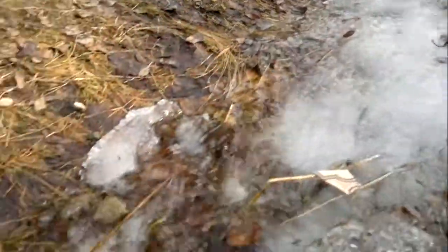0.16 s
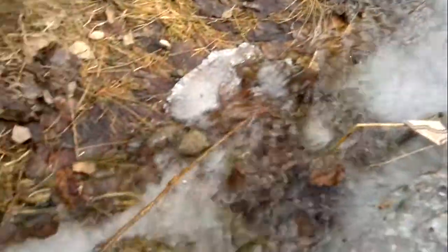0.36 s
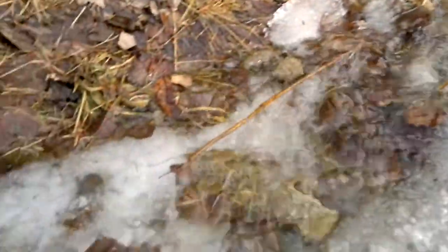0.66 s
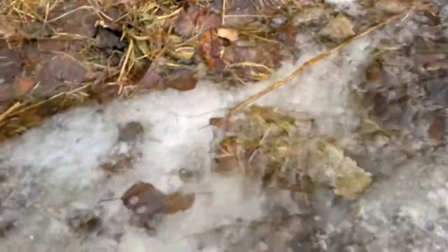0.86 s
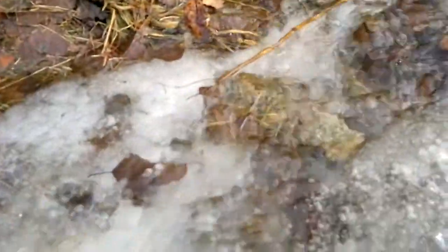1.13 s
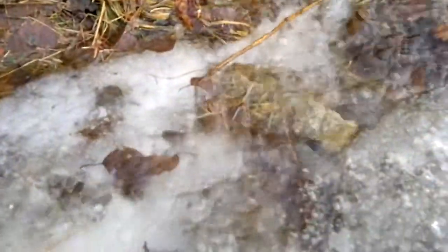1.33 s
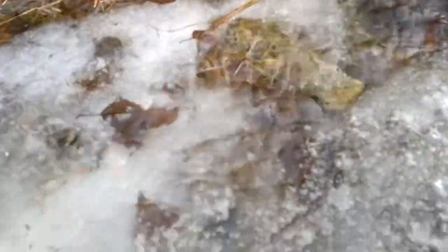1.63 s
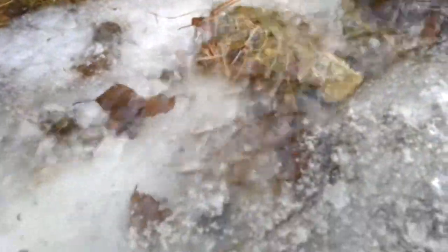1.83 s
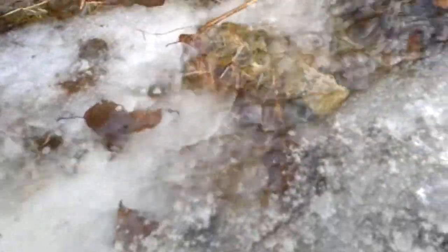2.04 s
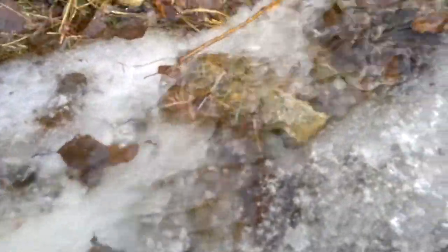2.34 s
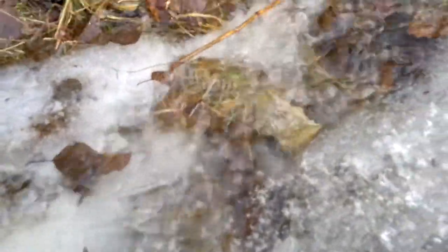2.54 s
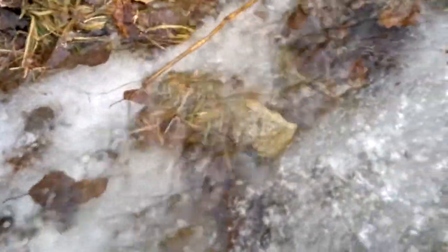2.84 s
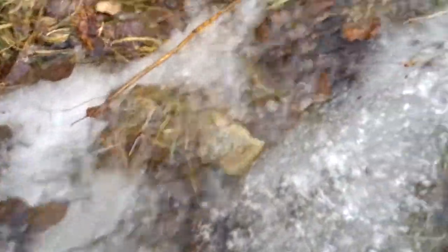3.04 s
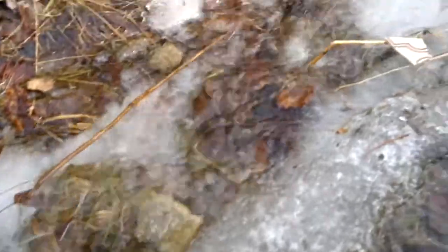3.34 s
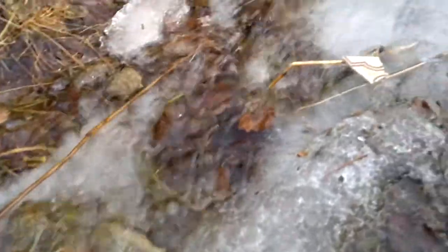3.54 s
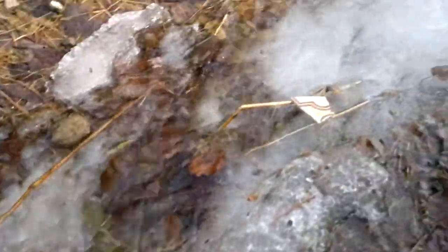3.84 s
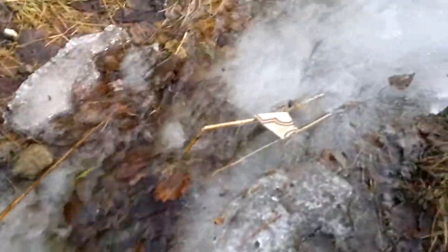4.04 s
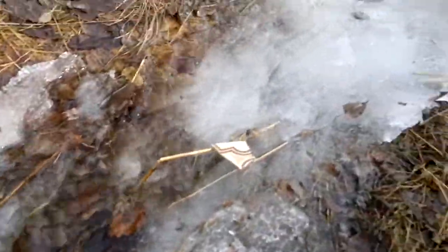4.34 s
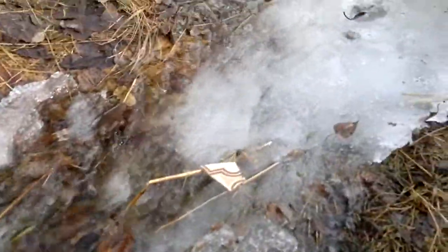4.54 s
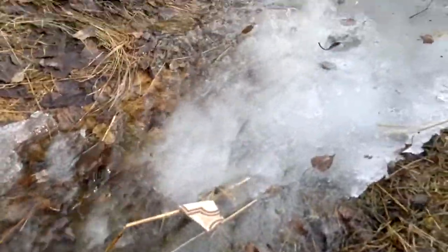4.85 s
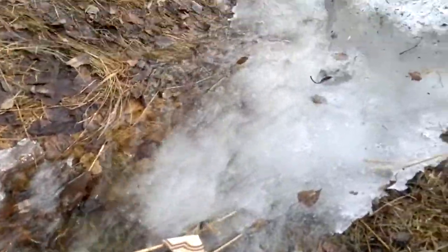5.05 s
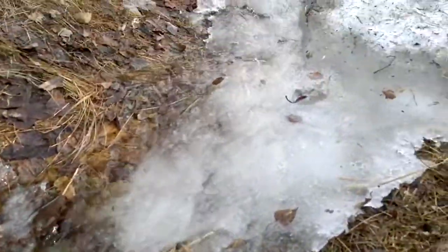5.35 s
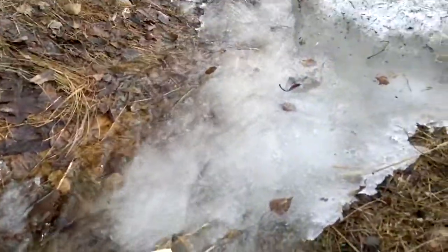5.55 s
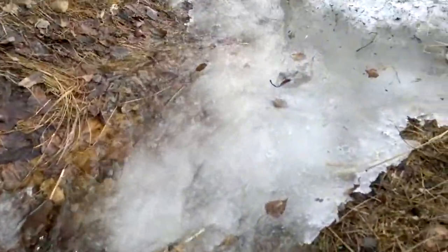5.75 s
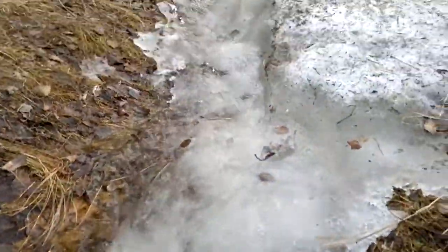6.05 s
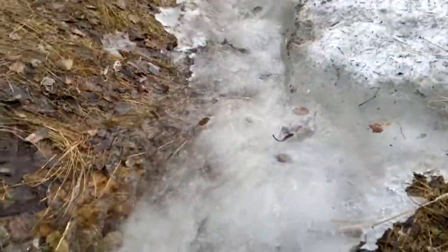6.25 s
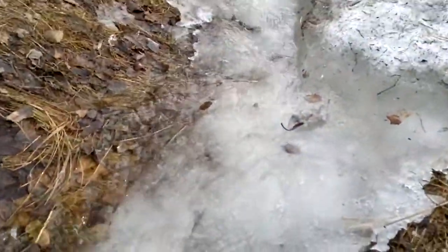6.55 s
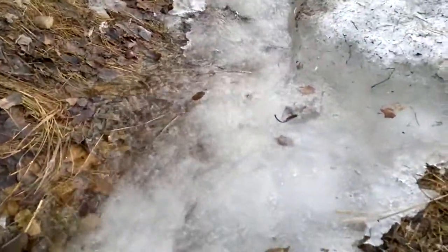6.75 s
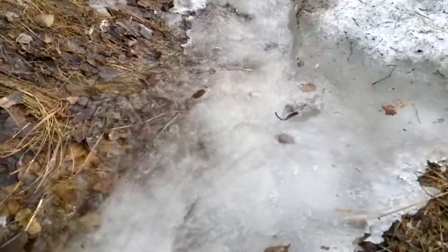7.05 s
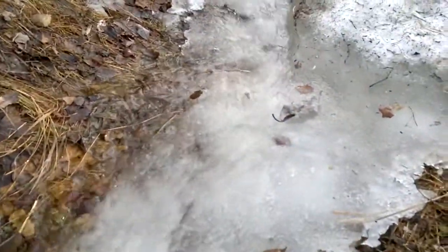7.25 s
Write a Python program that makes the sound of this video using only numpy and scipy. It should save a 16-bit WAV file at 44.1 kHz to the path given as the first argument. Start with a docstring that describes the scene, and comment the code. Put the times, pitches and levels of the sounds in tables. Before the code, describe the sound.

A small meltwater stream runs throughout, close and outdoors with no echo: a soft, rounded low-mid burbling rush, lighter splashing towards the right, and a very faint fizz. Nearer, mostly left, tiny bubbles tick and gurgle, and single clear plinks ring at 0.1 to 0.3 s, 0.8 s, 2.7 s, 5.2 s and in a quick run near 5.9 s. Wind buffets the microphone from 0.5 s, with light thumps and pops until 0.9 s, then a calmer gap. Heavy booming thumps with snapping pops hit at 1.9 and 2.2 s, with another very strong one at 2.8 s. Water is more exposed from 3 to 4 s, before a hard thump at 4.2 s, rumble around 4.5 s and left-leaning hits at 5 and 5.3 s. Smaller pops come at 5.9 and 6.3 s, a sharp bright snap at 6.5 s, then low breeze rumble swells to the end at about 7.3 s.

```python
"""A small meltwater stream rushes over ice and dead leaves throughout: shaped noise plus swarms of ringing bubbles.
Close by, mostly on the left, tiny bubbles tick and gurgle, and single plinks ring from the first moments on.
From half a second in, wind thumps and pops on two microphone ports: noise swells and pressure spikes.
Strong hits cluster around 2 s and 2.8 s, come back at 4.2 s and 5 s, and a sharp snap lands near 6.5 s.
The breeze is strongest at the very end; a limiter ducks whatever exceeds its ceiling."""
import sys
import numpy as np
from scipy import signal
from scipy.fft import rfft, irfft, next_fast_len
from scipy.io import wavfile
from scipy.ndimage import uniform_filter1d, minimum_filter1d, map_coordinates

SR = 44100
rng = np.random.default_rng(int(sys.argv[2]) if len(sys.argv) > 2 else 0)


def transcribe(signal):
    """Save signal, clipped to [-1, 1], as a 16-bit WAV file at the path in sys.argv[1]."""
    frames = np.atleast_2d(signal).T
    limited = np.clip(frames, -1, 1)
    pcm = np.round(limited * 32767).astype(np.int16)
    wavfile.write(sys.argv[1], SR, pcm)


N = 325899
T = np.arange(N) / SR  # time of each sample [s]
TOP_HZ = 15700  # band limit of the whole mix


def amp(db):
    """Decibels to gain."""
    return 10 ** (np.asarray(db) / 20)


def unit(x):
    """Scaled to rms 1."""
    return x / np.sqrt(np.mean(x ** 2) + 1e-20)


def curves(rows):
    """One automation curve, a value per sample, for each column after the time."""
    s, *cols = np.transpose(rows)
    return [np.interp(T, s, c) for c in cols]


def wobble(rate):
    """A random curve, smooth between its knots, rate knots a second."""
    knots = rng.standard_normal(int(N * rate / SR) + 4)
    return map_coordinates(knots, [T * rate], mode="nearest")


def sides(pan_db):
    """Left and right gains whose mean is 1; positive pan leans left."""
    left = amp(np.atleast_1d(pan_db))
    return 2 * np.array([left, np.ones_like(left)]) / (1 + left)


def colour(x, points):
    """EQ: x through a response drawn through (frequency [Hz], level [dB]) points."""
    n = x.shape[-1]
    size = next_fast_len(n + 4096)  # padding against wrap-around
    hz, db = np.transpose(points)
    log_hz = np.log(np.fft.rfftfreq(size, 1 / SR) + 1)
    gain = amp(np.interp(log_hz, np.log(hz), db))
    return irfft(rfft(x, size) * gain, size)[..., :n]


def pair(alike, size=N):
    """Stereo white noise; alike is the correlation of its two sides."""
    mid, side = rng.standard_normal((2, size))
    turn = np.arccos(np.clip(alike, -1, 1)) / 2
    return np.cos(turn) * mid + np.sin(turn) * np.array([side, -side])


def patchy(x, depth_db):
    """Patches of random gain across time and pitch, shared by both sides."""
    z = signal.stft(x, nperseg=512)[2]
    field = rng.standard_normal(z.shape[1:])
    field = uniform_filter1d(field, size=4, axis=0)  # across pitch
    field = uniform_filter1d(field, size=9, axis=1)  # across time
    return signal.istft(z * amp(depth_db * unit(field)), nperseg=512)[1][:, :N]


def add(track, s, sound):
    """Mix a stereo sound in from time s."""
    start = max(round(s * SR), 0)
    part = track[:, start:start + sound.shape[1]]
    part += sound[:, :part.shape[1]]


def bubbles(s, size, hz, cycles, pan_db, rise):
    """Each bubble rings for a few cycles and climbs in pitch as it nears the surface."""
    step = np.arange(640)  # samples that each ring is given
    turns = hz[:, None] * step / SR
    age = turns / cycles[:, None]
    swell = np.exp(-age) * (1 - np.exp(-turns))  # soft onset, then decay
    tone = np.sin(2 * np.pi * turns * (1 + rise * np.minimum(age, 10) / 2))
    ring = size[:, None] * swell * tone
    where = ((s * SR).astype(int)[:, None] + step).ravel()
    return np.array([np.bincount(where, (ring * g[:, None]).ravel(), N)[:N] for g in sides(pan_db)])


def swarm(count, hz, octaves, cycles, scatter_db, pan_db):
    """Bubbles of random size at random times, many small and few large, rms 1."""
    when, strength = rng.random((count, 2)).T
    pitch, life, place = rng.standard_normal((count, 3)).T
    size = amp(-scatter_db * np.log(strength + .03))  # the offset caps the largest
    pitches = np.minimum(hz * 2 ** (octaves * pitch), TOP_HZ)
    lives = cycles * np.exp(life / 3)
    return unit(bubbles(when * N / SR, size, pitches, lives, pan_db + 3 * place, rise=0.051))


# the water's loudness before trims: (time [s], rush [dB], splash [dB], fizz [dB])
WATER_FLOW = [(0.0, -49.5, -66, -77), (0.3, -46, -58.5, -77.0), (0.62, -46, -64.5, -75),
              (0.87, -44, -62, -77), (1.45, -47, -66.5, -77.5), (2.02, -45, -64, -77.5),
              (2.35, -42.0, -58.5, -76.5), (2.75, -45.5, -57.5, -74.5), (2.86, -51.5, -62.5, -81),
              (3.35, -50, -62.5, -77.5), (3.58, -47, -59, -77), (4.18, -49.5, -63, -76.5),
              (4.5, -53.5, -67.5, -79.5), (5.1, -46, -61, -75), (5.45, -49.5, -61, -78),
              (6.08, -45.5, -56.5, -71.5), (6.65, -47.5, -63.5, -76.0), (7.3, -51.5, -63, -74.5)]
# tone of the water's three noise layers: (frequency [Hz], relative level [dB])
RUSH_TONE = [(40, -7), (120, -1), (250, 2), (370, 0), (480, -1.5), (620, -1), (800, -4.5), (1000, -7.5),
             (1250, -14.5), (1600, -20), (2200, -49), (3000, -63), (5000, -78)]
SPLASH_TONE = [(600, -28.5), (1200, -1.5), (1600, -2), (2000, 1.5), (2350, -7), (2650, -14), (3000, -27),
               (4000, -31.5), (8000, -59)]
FIZZ_TONE = [(1000, -14.5), (2800, 0.5), (4000, 2.5), (6000, -2.5), (10000, -3), (12500, -8),
             (15500, -19.5)]


def stream():
    """The burbling rush of the whole channel, the brighter splashing of its rapids and a faint fizz."""
    rush_db, splash_db, fizz_db = curves(WATER_FLOW)
    rush = unit(colour(patchy(pair(alike=0.94), depth_db=2.0), RUSH_TONE)) * sides(0.86)
    burble = swarm(count=2000, hz=645.7, octaves=0.454, cycles=2.44, scatter_db=1.5, pan_db=2.5)
    splash = unit(colour(patchy(pair(alike=-0.23), depth_db=2.5), SPLASH_TONE)) * sides(-11)
    fizz = unit(colour(pair(alike=0.03), FIZZ_TONE)) * sides(1.6)
    body = (rush + amp(-8) * burble) * amp(rush_db + 2.5 + 1.57 * wobble(8.1))
    splashing = splash * amp(splash_db + 2.5 + 1.5 * wobble(6))
    return body + splashing + fizz * amp(fizz_db + 0.86)


GURGLE_DB, TICK_DB, TINKLE_DB = -7.5, -1.5, 0  # gurgles re the splash; ticks and tinkle re the fizz
CLUSTER_HZ, CLUSTER_DB = 13, 4.5  # level swings of the bubbles: knots a second, greatest depth
SPURT_S = 0.026  # standard deviation of a spurt's bell curve
# spurts, brief changes in bubble level before each layer's share: (time [s], boost [dB])
BUBBLE_SPURTS = [(.24, 5), (.83, 6.5), (1.72, 7.5), (2.53, 2), (2.66, 3.5), (2.75, 3), (3.55, 1),
                 (5.87, 4.5), (6.6, -1), (6.97, 7.5)]
# tone of the bursting bubbles: (frequency [Hz], relative level [dB])
TICK_TONE = [(2000, -8), (3300, -8.5), (4500, -3.5), (6000, -4.5), (8000, 1), (10300, -0.5), (12500, -5.5),
             (15500, -14.5)]


def riffle():
    """Water folds over ice close by: gurgles follow the splashing, tiny bursting bubbles follow the fizz."""
    _, splash_db, fizz_db = curves(WATER_FLOW)
    spurt_db = sum(db * np.exp(-((T - s) / SPURT_S) ** 2 / 2) for s, db in BUBBLE_SPURTS)
    cluster_db = CLUSTER_DB * np.tanh(wobble(CLUSTER_HZ)) + spurt_db
    gurgle = swarm(count=2000, hz=1950, octaves=.22, cycles=6, scatter_db=5, pan_db=13)
    bursts = swarm(count=2400, hz=7800, octaves=.5, cycles=1.6, scatter_db=7, pan_db=19)
    tinkle = swarm(count=2000, hz=4300, octaves=.42, cycles=6, scatter_db=5.5, pan_db=16)
    ticks = unit(colour(bursts, TICK_TONE))
    spray = amp(TICK_DB) * ticks + amp(TINKLE_DB) * tinkle
    gurgling = gurgle * amp(splash_db + GURGLE_DB + 0.77 * cluster_db)
    return gurgling + spray * amp(fizz_db + cluster_db)


PLINK_PAN_DB, PLINK_CYCLES = 18.5, 7.3  # lean to the left; cycles in which a ring decays to 1/e
# single bubbles that ring out clearly: (time [s], level before a common lift [dB], starting pitch [Hz])
CLEAR_PLINKS = [(.075, -51, 3280), (.225, -48, 2030), (.239, -57, 4760), (0.333, -39, 1940),
                (.623, -53.5, 2740), (.636, -54, 8000), (.83, -42.5, 1970), (1.27, -48.5, 1940),
                (1.31, -51, 13300), (2.477, -50, 1960), (2.708, -44.5, 2160), (2.771, -48, 4380),
                (3.334, -57, 2920), (3.958, -46.5, 2160), (4.359, -51.5, 5670), (5.158, -44, 4050),
                (5.841, -52, 4220), (5.861, -52, 5160), (5.877, -49, 4300), (5.894, -47, 3520),
                (6.201, -49, 4350), (6.506, -58, 4560), (6.618, -55, 6550), (7.132, -54.5, 3720)]


def plinks():
    """Single bubbles ring out above the rest, each a decaying sine."""
    s, db, hz = np.transpose(CLEAR_PLINKS)
    each = np.ones(len(s))
    return bubbles(s, amp(db + 4), hz, PLINK_CYCLES * each, PLINK_PAN_DB * each, rise=0.016)


GUST_RISE, GUST_FALL = 0.93, 0.88  # factors on a gust's spread: it swells a little slower than it fades
# eddies that hit the ports:
# (time [s], thump level [dB], spread before rise and fall factors [s], left-right [dB], hiss level [dB])
EDDY_HITS = [(.533, -35, 0.021, 15, -61.5), (.776, -26.5, 0.01, 6, -53.5), (0.915, -25, 0.0046, 29, -67),
             (1.627, -29, .03, 12, -66), (1.715, -31, 0.032, 6, -68), (1.819, -19.5, 0.015, 6.5, -70),
             (1.887, -7, 0.011, 0, -51), (2.162, -7.5, 0.02, 8.5, -51), (2.203, -11.5, 0.0085, 4, -65.5),
             (2.424, -24, 0.013, 11.5, -51.5), (2.531, -16.5, 0.007, 8, -53),
             (2.561, -17.5, 0.0088, -2.5, -63), (2.651, -39, .012, -3, -55), (2.805, -6.5, 0.012, 0.5, -53),
             (2.944, -29.5, 0.0094, -3, -67.5), (3.262, -31.5, 0.032, 10, -86),
             (3.549, -29, 0.012, 4, -54.5), (3.692, -27, 0.023, 8, -76), (4.249, -8.5, 0.015, 3.5, -60),
             (4.544, -17.5, 0.026, 6, -70), (4.629, -20, 0.019, 7.5, -79), (5.013, -11, 0.0069, 28, -67.5),
             (5.048, -30, 0.022, 18, -66), (5.249, -26, .0086, 10, -60), (5.315, -27, 0.015, 23, -66),
             (5.929, -36.5, 0.033, -5, -55), (6.098, -28.5, 0.025, -2, -58.5),
             (6.281, -28.5, 0.014, 1, -62), (7.042, -23.5, 0.015, -12, -77)]
# tone of a gust's two layers: (frequency [Hz], relative level [dB])
THUMP_TONE = [(10, -28.5), (28, -3.5), (48, 0), (70, -6), (120, -14.5), (180, -21), (330, -35), (700, -40),
              (1400, -68.5), (4000, -104)]
HISS_TONE = [(100, -10.5), (400, -3.5), (800, -6), (1400, 8.5), (2500, 5), (3500, -8.5), (5500, -16.5),
             (9000, -37), (15000, -42)]


def gusts():
    """Each eddy that hits the ports makes a thump and a short hiss, two noises under one swell."""
    out = np.zeros((2, N))
    size = SR // 5
    t = (np.arange(size) - size / 2) / SR
    for s, db, spread, pan_db, hiss_db in EDDY_HITS:
        spreads = spread * np.where(t < 0, GUST_RISE, GUST_FALL)
        swell = np.exp(-(t / spreads) ** 2 / 2)
        thump = unit(swell * colour(pair(alike=0.68, size=size), THUMP_TONE))
        hiss = unit(swell * colour(pair(alike=0.25, size=size), HISS_TONE))
        hit = amp(db) * thump + amp(hiss_db) * hiss
        loudness = np.sqrt(np.mean(swell ** 2))  # longer swells carry more energy
        add(out, s + t[0], hit * loudness * sides(pan_db))
    return out


CRACK_MS = 1.21  # a crack falls to 1/e this far either side of its centre
# pressure snaps on the ports, levels before the high-pass:
# (time [s], spike level [dB], width [ms], left-right [dB], crack level [dB])
PORT_SNAPS = [(.531, -19, 0.6, 11, -46), (0.5355, -17, 0.82, 19, -60), (.779, -15.5, .51, 2, -57),
              (0.9127, -18.5, 0.91, 35, -70), (1.873, -15.5, 0.35, 13, -46), (1.888, -7, 0.63, -8, -42),
              (1.919, -18, 0.32, 19, -59), (2.146, -11, .37, 2, -39), (2.155, -6, 1.44, -4, -35.5),
              (2.195, -24, 0.99, 9, -60), (2.5545, -11.5, 0.37, -1, -39), (2.788, 1, 0.77, -1, -32.5),
              (2.8, -13, .98, 14, -32.5), (4.2326, -2.5, 1.07, 7, -30.5), (5.0036, -10, 0.83, 17, -46),
              (5.113, -20, .9, 13, -64), (5.129, -26, 0.45, 11, -61), (5.3095, -8, 0.33, 19, -60),
              (5.907, -19, 0.61, 28, -54), (5.923, -10, .59, -8, -33.5), (5.929, -15, 0.97, 12, -54),
              (6.267, -9, 0.46, 14, -40), (6.4695, 0.5, 0.31, 12.5, -21.5)]
# tone of a pop's crack: (frequency [Hz], relative level [dB])
CRACK_TONE = [(100, -6.5), (500, 9), (1500, 5), (2500, 1), (3200, -8), (4000, -19), (7000, -21),
              (11000, -34), (15000, -41)]


def pops(bass_hz=60, rebound=0.21):
    """A small eddy snaps across a port: a lopsided spike that the high-pass swings back, and a brief crack."""
    out = np.zeros((2, N))
    t = np.arange(-SR // 20, SR // 20) / SR
    ms = 1000 * t
    for s, db, width_ms, pan_db, crack_db in PORT_SNAPS:
        u = ms / width_ms
        spike = (1 - rebound * u) * np.exp(-u ** 2 / 2)
        noise = unit(colour(pair(alike=.6, size=len(t)), CRACK_TONE))
        crack = noise * np.exp(-(ms / CRACK_MS) ** 2)
        add(out, s + t[0], (amp(db) * spike + amp(crack_db) * crack) * sides(pan_db))
    return signal.sosfilt(signal.butter(2, bass_hz, "high", fs=SR, output="sos"), out)


STIR_LEAD_S, STIR_TRAIL_S = 0.045, 0.028  # time constants of restless air before and after a gust


def stirred(s, db, pan_db):
    """Stereo strength of the restless air that builds before each gust and settles after it."""
    lag = T - s[:, None]
    near = np.exp(-np.abs(lag) / np.where(lag < 0, STIR_LEAD_S, STIR_TRAIL_S))
    return (sides(pan_db) * amp(db)) @ near


STIR_RUMBLE_DB, STIR_FLUTTER_DB = -23, 16.5  # restless air: rumble re the thump, flutter re the hiss
BREEZE_DB, BREEZE_FLUTTER_DB = 0, -17  # rumble and flutter re the breeze
# the breeze on the ports before its wobble: (time [s], strength [dB], left-right [dB])
BREEZE = [(0.0, -49, 12), (0.25, -43.5, 5), (0.7, -38.5, 22), (1.3, -61, 9), (1.52, -48.5, 20),
          (1.7, -33.5, 20), (2.3, -44.5, 7), (3.05, -54.5, 13), (3.6, -47, 24), (3.95, -58.5, 12),
          (4.45, -29.5, 7.5), (4.75, -45.5, 16), (5.2, -37.5, 12), (5.6, -43.5, 10.0), (6.1, -38.5, 1),
          (6.65, -31.5, 17.5), (7.05, -35, -3), (7.3, -24.5, -2)]
# tone of the rumble and of the small vortices: (frequency [Hz], relative level [dB])
BUFFET_TONE = [(10, -8), (28, 0), (55, 7), (90, -3.5), (130, -11.5), (200, -26), (400, -42), (1000, -78),
               (3000, -93.5)]
VORTEX_TONE = [(40, -3.5), (110, -4), (180, -1.5), (300, -7), (600, -16), (1000, -20.5), (2500, -48.5),
               (6000, -79)]


def wind():
    """Breeze and restless air rumble on the ports; small vortices flutter above, nearly unrelated side to side."""
    breeze_db, breeze_pan_db = curves(BREEZE)
    s, thump_db, _, pan_db, hiss_db = np.transpose(EDDY_HITS)
    breeze = amp(breeze_db) * sides(breeze_pan_db)
    # breeze and restless air add as powers
    rumble = np.hypot(amp(BREEZE_DB) * breeze, stirred(s, thump_db + STIR_RUMBLE_DB, pan_db))
    stirred_flutter = stirred(s, hiss_db + STIR_FLUTTER_DB, pan_db + 2.5)
    flutter = np.hypot(amp(BREEZE_FLUTTER_DB) * breeze, stirred_flutter)
    buffeting = unit(colour(pair(alike=0.75), BUFFET_TONE))
    vortices = unit(colour(pair(alike=0.12), VORTEX_TONE))
    rumble = rumble * amp(1.17 * wobble(5.7)) * buffeting
    flutter = flutter * amp(5.4 * np.array([wobble(35), wobble(51)])) * vortices
    return rumble + flutter


def scene():
    """Water below, wind on the microphone."""
    return stream() + riffle() + plinks() + gusts() + pops() + wind()


def record(dry, ceiling=1.0, hold_s=0.011):
    """A limiter ducks each side where it exceeds the ceiling; a steep low-pass removes the top."""
    hold = max(int(hold_s * SR), 2)
    needed = np.minimum(1, ceiling / (np.abs(dry) + 1e-9))
    gain = uniform_filter1d(minimum_filter1d(needed, hold), hold)
    limited = dry * gain
    return signal.sosfilt(signal.ellip(10, .1, 80, TOP_HZ, fs=SR, output="sos"), limited)


dry = scene()
out = record(dry)
transcribe(out)
```